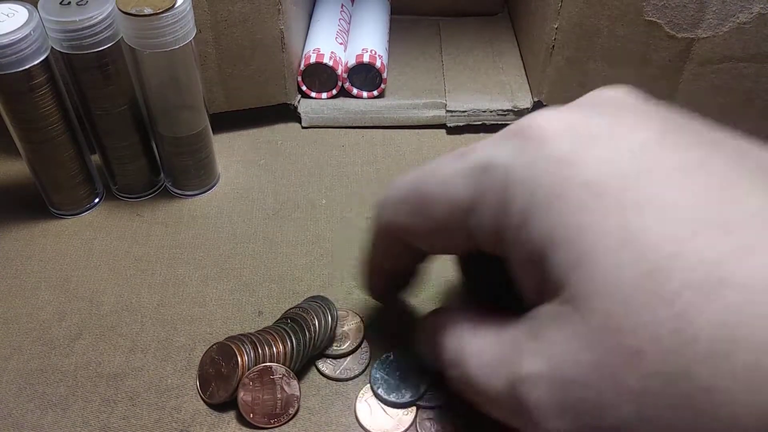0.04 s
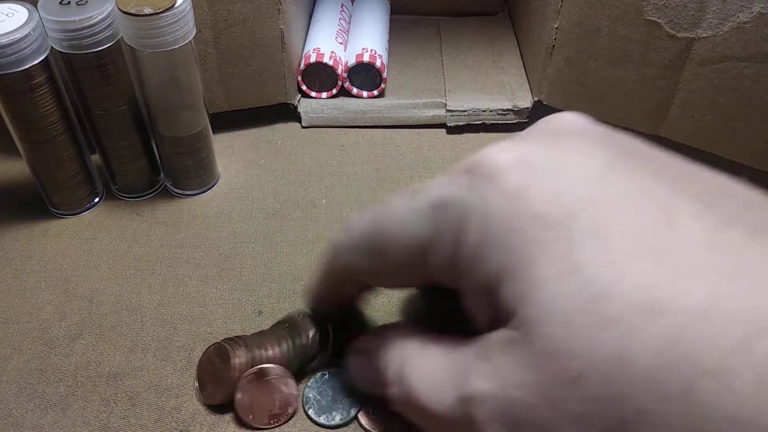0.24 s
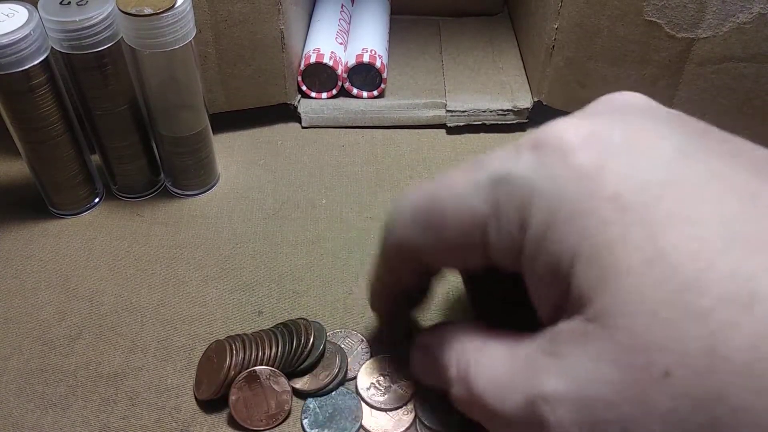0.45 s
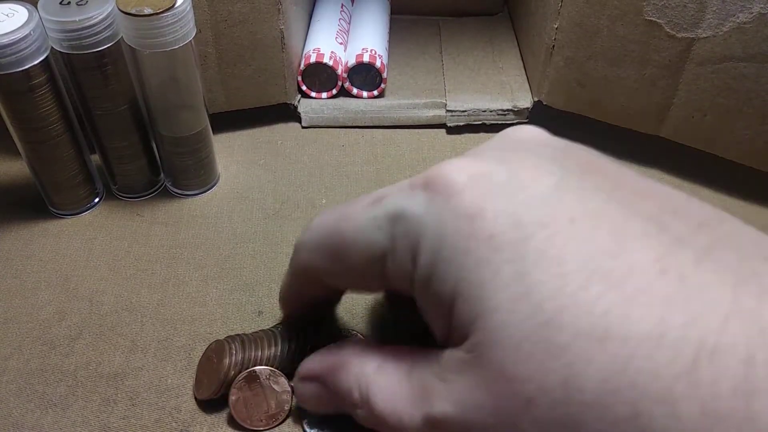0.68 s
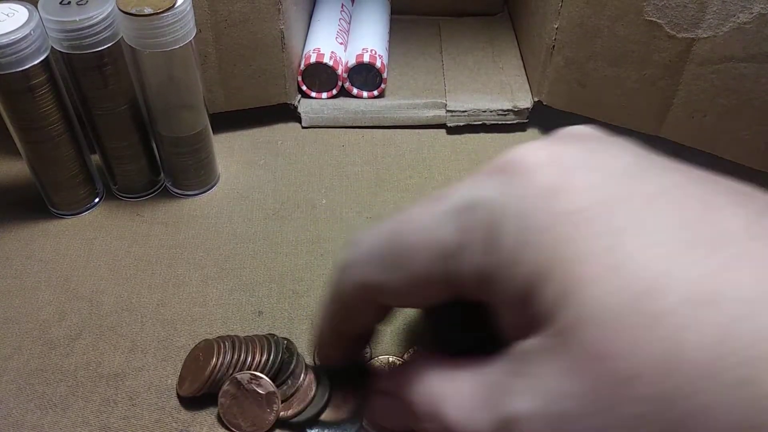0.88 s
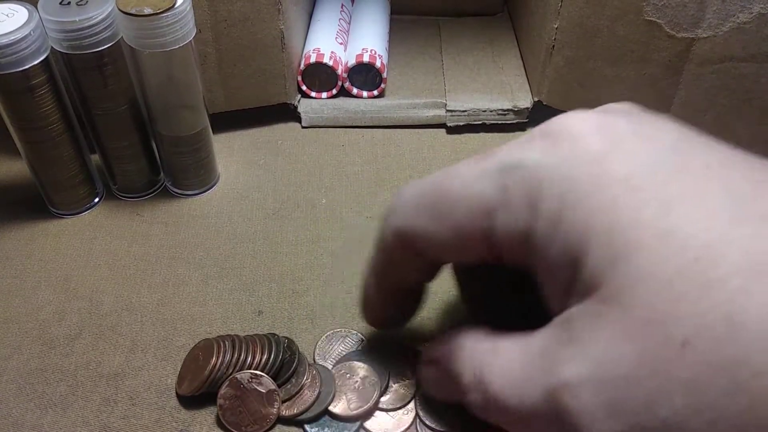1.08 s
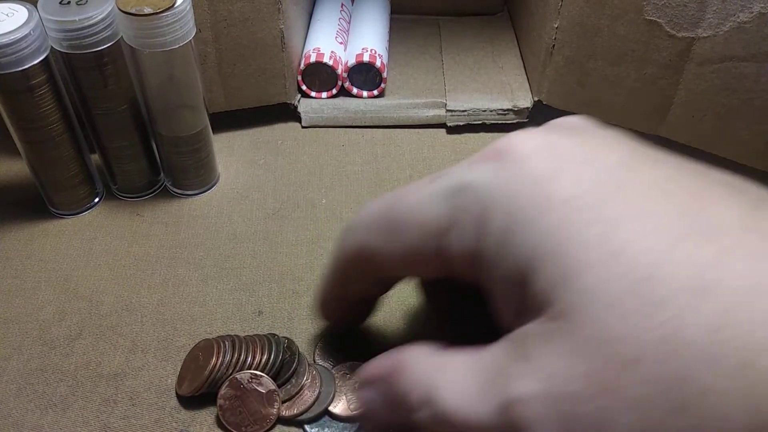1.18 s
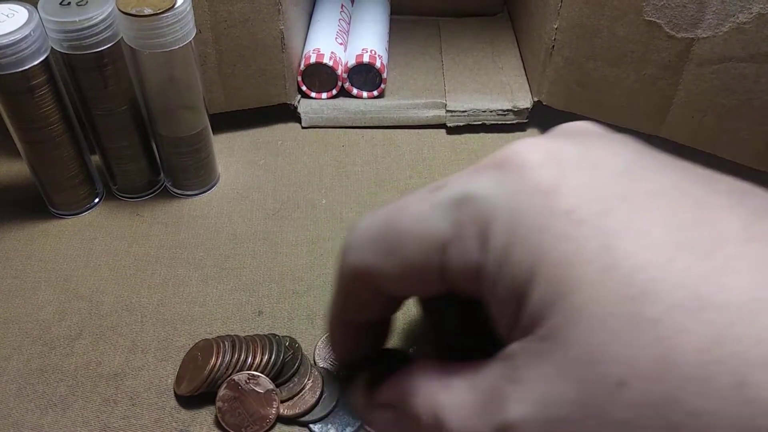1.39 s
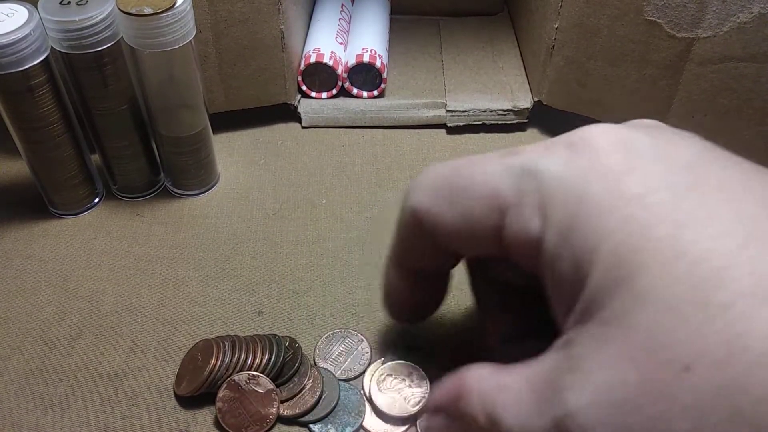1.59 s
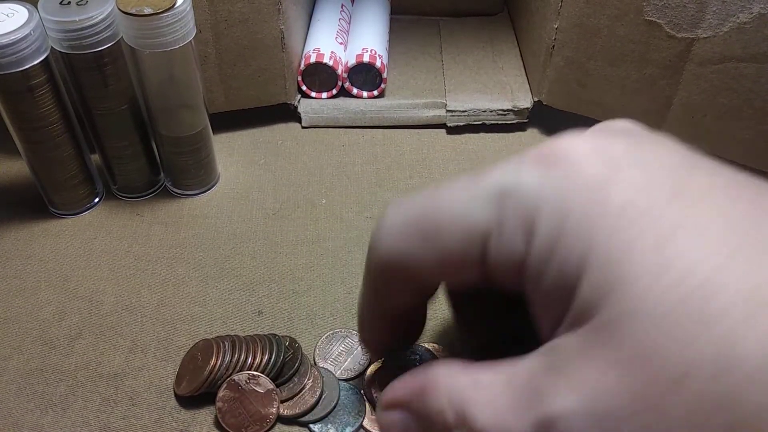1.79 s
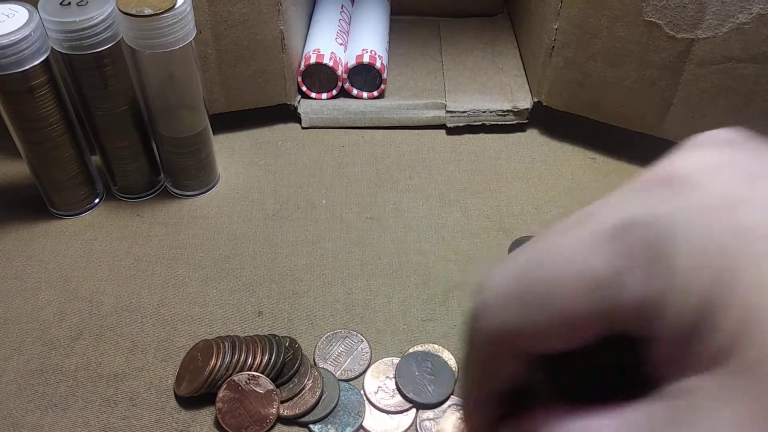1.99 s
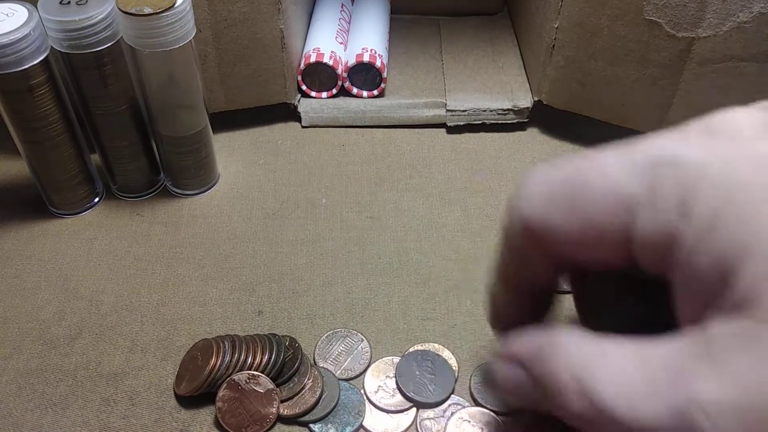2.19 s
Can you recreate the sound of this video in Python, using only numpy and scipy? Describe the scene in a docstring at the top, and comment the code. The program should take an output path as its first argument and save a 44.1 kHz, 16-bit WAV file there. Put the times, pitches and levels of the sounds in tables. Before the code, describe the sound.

Coins slide and click together on cardboard, heard up close in a quiet room. A first flurry of scrapes and short clicks peaks around 0.3 seconds with a soft thud. Lighter clinks and rubbing follow from 0.8 to 1 second. Sharper clicks come between 1.3 and 1.6 seconds, and a last cluster with rougher dragging near 2 seconds trails off. Now and then a coin rings briefly.

```python
"""Sorting coins in a cardboard box

Fingers slide coins over the floor of a box, heard up close in mono. The coins rub on the card,
grind across one another and knock together in short, dull clicks. Now and then a loose coin
rings or the card thuds. The box walls and a quiet room answer with short echoes."""
import sys
import numpy as np
from scipy import signal
from scipy.fft import rfft, irfft, next_fast_len
from scipy.io import wavfile
from scipy.ndimage import uniform_filter1d, map_coordinates

SR = 44100
rng = np.random.default_rng(int(sys.argv[2]) if len(sys.argv) > 2 else 0)


def wav_out(sig):
    """Save sig, one row per channel (or a flat mono array), as 16-bit PCM at SR to the path in sys.argv[1]."""
    wavfile.write(sys.argv[1], SR, np.round(np.clip(np.atleast_2d(sig).T, -1, 1) * 32767).astype(np.int16))


N = 99225

# Levels are relative. A "tone" sets the strength of each frequency; t60 is the time to fade by 60 dB.
# Tone of the room's hiss: f/Hz, level/dB
HISS_TONE = [(25, -9), (220, 4.5), (600, 4.5), (6400, -23), (7500, -28), (15700, -27.5)]
# How hard coins and fingers drag on the card: t/s, level/dB
DRAG_EFFORT = [(0, -55), (0.091, -65), (.122, -101.5), (0.148, -59.5), (.22, -56), (.32, -51.5), (.36, -60),
               (0.441, -55), (.49, -78), (0.529, -75), (.56, -63.5), (0.584, -63.5), (0.608, -83),
               (0.692, -73), (0.724, -57.5), (.79, -54.5), (.88, -56), (.95, -55), (1.02, -58),
               (1.043, -73.5), (1.11, -63.5), (1.174, -81.5), (1.235, -64), (1.28, -56), (1.36, -53),
               (1.55, -57.5), (1.687, -56), (1.715, -90.5), (1.75, -75), (1.824, -59.5), (1.859, -66.5),
               (1.887, -50.5), (1.96, -46.5), (2.051, -58), (2.25, -58.5)]
# Tone of the rasp on the card's fibres: f/Hz, level/dB
RASP_TONE = [(150, -14.5), (600, -0.5), (900, 3), (1350, 2), (1750, 0), (2250, 1.5), (4000, 0), (5500, -5),
             (6500, 1), (7300, -24.5), (10000, -14), (15700, -25)]
# Tone of the rumbling box floor: f/Hz, level/dB
RUMBLE_TONE = [(25, -47), (55, -6.5), (120, -5.5), (160, -3.5), (230, -0.5), (330, -5), (490, -9),
               (660, -14.5), (4000, -80.5)]
# A coin or finger presses down on the card: t/s, level/dB
PRESSES = [(0.295, -34), (.32, -42.5), (0.75, -49), (0.761, -42), (0.847, -42), (1.315, -46.5),
           (1.365, -42.5), (1.3817, -33.5), (1.502, -40), (1.872, -51), (1.942, -33), (1.991, -68)]
# The notes at which the box floor vibrates: f/Hz, level/dB, t60/s
CARD_NOTES = [(114, -16.5, 0.051), (165.4, -1.5, 0.07), (209, 1.5, 0.058), (265, -4, 0.044),
              (403, -2, 0.049), (444.4, -9, 0.026)]
# The notes of the coin heap in its box: f/Hz
HEAP_NOTES = [2300, 2745, 3035, 3355, 4035, 4325, 4817, 5170, 6274, 6600, 7226, 7494, 7787, 8888]
# One coin rings, lower and shorter when it lies against others: t/s, level/dB, f/Hz, t60/s
COIN_RINGS = [(.263, -45, 13200, 0.013), (.804, -47, 12900, 0.029), (.8185, -34, 12850, 0.054),
              (.8447, -30.5, 12750, 0.051), (.9203, -40, 13000, 0.019), (.9735, -29.5, 7400, 0.014),
              (1.3695, -33, 13030, .04), (1.5015, -23.5, 4120, 0.02), (1.9785, -40, 13150, .04),
              (1.9905, -34.5, 12900, 0.033)]
# A coin's closely spaced notes: ratio to its pitch, level/dB
COIN_NOTES = [(.99, -1.5), (1.008, -1), (1.035, -7.5)]
# Coin grinds over coin, rising to a peak at t and falling again, by 20 dB each way:
# t/s, level/dB, rise/s, fall/s, brightness/(dB per octave), singing f/Hz
STROKES = [(0.186, -48.5, 0.046, 0.18, -1, 4120), (0.289, -42.5, 0.066, 0.089, -5, 7200),
           (0.308, -25, .026, 0.014, 10.5, 7600), (0.392, -40.5, 0.057, 0.04, 0, 5200),
           (0.794, -50.5, 0.077, 0.19, 6.5, 2830), (.947, -40, 0.068, 0.038, 3.5, 6670),
           (1.375, -42.5, 0.071, 0.078, 0.5, 6400), (1.461, -51.5, 0.084, 0.17, -2, 3900),
           (1.61, -51, 0.082, 0.058, 3, 4130), (1.9, -45, 0.024, 0.032, -1, 3990),
           (1.95, -28.5, 0.019, 0.023, 0, 7800), (1.965, -37.5, .02, 0.06, 5.5, 3420),
           (2.02, -53, 0.1, 0.23, -2.5, 2880)]
# Tone of the grinding: f/Hz, level/dB
SCRAPE_TONE = [(80, -26), (230, -1.5), (500, -1.5), (750, -15), (1700, -14.5), (2200, 0), (5000, -1),
               (7700, -7.5), (9400, -8), (11300, -24.5), (13200, -16.5), (15700, -17)]
# Coin knocks on coin: t/s, level/dB, chatter length/s, brightness/(dB per octave), top treble/dB
CONTACTS = [(0.134, -48.5, .003, -6, 6), (0.219, -27.5, .0014, -4, 5.5), (.263, -48, .004, -2, 2),
            (0.291, -37, .0015, 3.5, -2.5), (0.2946, -24, .002, 6.5, -11.5), (0.2987, -29.5, .001, -13, -5),
            (0.312, -24.5, .001, 15, -7), (0.317, -30, .0015, 6.5, -7.5), (0.3197, -23.5, .0015, -1, -3),
            (0.335, -26, .0008, 8, -9), (0.339, -31.5, .003, -3.5, -1), (0.353, -35.5, .0012, 4, 1),
            (0.3885, -35.5, .003, -2, 4), (0.7618, -39, .001, 5, -2), (0.7893, -38, .006, -0.5, 1),
            (0.805, -35.5, .002, -1, 3), (0.8178, -26.5, .0015, 4.5, 0), (0.8234, -35, .002, -5, 1),
            (0.8451, -28, .005, -0.5, 11), (0.858, -31, .0015, 6, -1), (.913, -39, .002, 1, -18),
            (0.962, -41, .002, -1, -15), (0.999, -44, 0.004, -4, -3), (1.263, -41.5, .003, -2, -6.5),
            (1.2669, -33, .0028, 1, -15), (1.304, -45, .005, -2, -2), (1.33, -41, .001, -3, -4),
            (1.352, -38, .003, -5, -14), (1.3645, -32.5, .003, 0.5, 2), (1.3688, -19.5, .0012, 2.5, 1),
            (1.3797, -23.5, .0005, 5, 18), (1.38, -22, .003, -1, 4), (1.4256, -40.5, .002, 8.5, 6),
            (1.478, -42, .002, -9, -3), (1.5018, -21.5, .0038, -3.5, 13), (1.5957, -39, .003, -4.5, 2),
            (1.6017, -36, .003, -3.5, 3), (1.6125, -29.5, .004, -4, 10.5), (1.6503, -35, .0012, -5.5, -5),
            (1.882, -45, 0.0027, -0.5, 3), (1.9075, -35, .001, 16, 0), (1.915, -35, .003, -1.5, 9),
            (1.9348, -25.5, .0015, 6, -18), (1.939, -22.5, .0035, 5, -0.5), (1.9484, -46, .003, 18, 2),
            (1.970, -25.5, .002, -5.5, 2), (1.991, -27.5, .005, -8.5, 16), (2.006, -37, .003, -4.5, 5),
            (2.0393, -40, .003, -4.5, 10), (2.081, -40.5, .002, -7.5, 11), (2.1226, -45, .002, -4, 9)]
# Tone of a knock between coins: f/Hz, level/dB
CLICK_TONE = [(80, -22), (250, 0), (500, -6.5), (750, -14.5), (1700, -14), (2100, 1), (4200, 3), (7000, 3),
              (9500, 1), (11500, -10), (13200, -6), (15700, -12)]


def amp(db):
    """Turn decibels into a factor to multiply by."""
    return 10 ** (np.asarray(db) / 20)


def unit(x):
    """Scale a signal to an average power of 1."""
    return x / np.sqrt(np.mean(x ** 2) + 1e-20)


def add(track, start_s, sound):
    """Mix a sound into the track at the given time."""
    part = track[max(0, round(start_s * SR)):][:len(sound)]
    part += sound[:len(part)]


def with_tone(x, tone, tilt_db=0, top_db=0):
    """Filter x to a tone; tilt_db is added per octave from 2 to 9 kHz, top_db above about 10 kHz."""
    size = 2048
    f = np.fft.rfftfreq(size, 1 / SR) + 1
    hz, db = np.transpose(tone)
    tilt = tilt_db * np.log2(np.clip(f, 2000, 9000) / 2000)
    top = top_db * np.clip((f - 8500) / 3000, 0, 1)
    gain = amp(np.interp(np.log(f), np.log(hz), db) + tilt + top)
    # Fold the filter forward in time, so nothing sounds before the hit that causes it.
    cepstrum = irfft(np.log(gain))
    cepstrum[1:size // 2] *= 2
    cepstrum[size // 2 + 1:] = 0
    kernel = irfft(np.exp(rfft(cepstrum)))
    return signal.fftconvolve(x, kernel / np.linalg.norm(kernel))[:len(x)]


def slips(per_s, spread, size=N):
    """Friction: tiny random hits of uneven size, kept at a steady overall strength."""
    hits = (rng.random(size) < per_s / SR) * np.sign(rng.standard_normal(size))
    hits *= np.exp(spread * rng.standard_normal(size))
    power = np.abs(uniform_filter1d(hits ** 2, size=400))
    return hits / np.sqrt(power + 1e-6)


def wobble(per_s):
    """A smooth curve through per_s random values each second."""
    return map_coordinates(rng.standard_normal(N // 10), [np.arange(N) * per_s / SR])


def struck(notes, attack_s):
    """One blow starts several fading notes, each a little stronger or weaker by chance."""
    t = np.arange(SR // 4) / SR
    ringing = sum(amp(db + rng.normal(0, 2) - 60 * t / t60) * np.sin(2 * np.pi * hz * t)
                  for hz, db, t60 in notes)
    return ringing * (1 - np.exp(-t / attack_s))


def room_hiss():
    """The faint, steady hiss of a quiet room."""
    return amp(-81.5) * with_tone(rng.standard_normal(N), HISS_TONE)


def wall_echo(x, t60, delay_s):
    """Walls send the sound back after a short delay, as a fading blur."""
    t = np.arange(SR // 3) / SR
    tail = rng.standard_normal(len(t)) * amp(-60 * t / t60) * (t > delay_s)
    return signal.fftconvolve(x, tail / np.linalg.norm(tail))[:N]


def with_heap_ring(x, t60=0.044):
    """The heap of coins rings briefly along with every contact."""
    t = np.arange(SR // 8) / SR
    decay = np.log(1000) / t60
    notes = sum(np.cos(2 * np.pi * hz * t) for hz in HEAP_NOTES)
    ring = 2 * decay / SR * np.exp(-decay * t) * notes
    return x + amp(-5.5) * signal.fftconvolve(x, ring)[:N]


def card_dragging(flutter_db=2.5, knocks_per_s=160):
    """Dragging rasps on the fibres, makes the box floor rumble and jostles the coins into tiny ticks."""
    effort_db = np.interp(np.arange(N) / SR, *np.transpose(DRAG_EFFORT))
    effort = amp(effort_db + flutter_db * wobble(per_s=90))
    rasp = with_tone(effort * slips(per_s=7000, spread=0.29), RASP_TONE)
    rumble = with_tone(effort * slips(per_s=7000, spread=0.29), RUMBLE_TONE)
    knocks = (rng.random(N) < knocks_per_s / SR) * np.exp(0.6 * rng.standard_normal(N))
    ticks = with_heap_ring(with_tone(knocks * effort ** 2 / effort.max(), CLICK_TONE))
    return amp(-3.5) * (rasp + rumble) + amp(16) * ticks


def card_thuds(pitch_spread=0.025):
    """The box floor booms; small random shifts of pitch stand for the hand's changing pressure."""
    out = np.zeros(N)
    for start_s, db in PRESSES:
        notes = [(hz * (1 + pitch_spread * rng.normal()), level, t60) for hz, level, t60 in CARD_NOTES]
        add(out, start_s, amp(db) * struck(notes, attack_s=0.0037))
    return out


def coin_rings():
    """A knocked coin rings briefly; its close notes beat against each other and shimmer."""
    out = np.zeros(N)
    for start_s, db, hz, t60 in COIN_RINGS:
        notes = [(hz * ratio, level, t60) for ratio, level in COIN_NOTES]
        add(out, start_s, amp(db) * struck(notes, attack_s=0.0009))
    return out


def coin_scrapes(lead_s=0.15, medium_db=-40.5, medium_catches_per_s=4500, grab_db=2.6):
    """Rims catch on the coins' raised faces, more often in fast, loud strokes; the coin sings faintly."""
    out, t = np.zeros(N), np.arange(SR // 2) / SR
    for peak_s, db, rise_s, fall_s, tilt_db, hz in STROKES:
        from_peak = np.maximum((lead_s - t) / rise_s, (t - lead_s) / fall_s)
        swell = amp(db - 20 * from_peak ** 1.35)
        speed = amp((db - medium_db) / 2)
        catches = slips(medium_catches_per_s * speed, spread=0.5, size=len(t))
        grip = amp(grab_db * wobble(per_s=220)[:len(t)])
        grit = unit(catches * grip)
        song = unit(signal.lfilter(*signal.iirpeak(hz, Q=18, fs=SR), grit))
        grind = with_tone(swell * grit, SCRAPE_TONE, tilt_db)
        add(out, peak_s - lead_s, grind + amp(-8.5) * swell * song)
    return out


def coin_clicks(chatter_spread=0.32, buzz_t60=0.027):
    """Coin hits coin: a sharp burst of tiny impacts (the chatter), then a faint dying buzz."""
    out, t = np.zeros(N), np.arange(2048) / SR
    for start_s, db, length_s, tilt_db, top_db in CONTACTS:
        fade = np.exp(-(t / length_s) ** 2)
        chatter = fade * rng.standard_normal(len(t))
        chatter *= np.exp(chatter_spread * rng.standard_normal(len(t)))
        chatter *= np.linalg.norm(fade) / np.linalg.norm(chatter)  # chance does not change its energy
        buzz = amp(-10 - 60 * t / buzz_t60) * rng.standard_normal(len(t))
        add(out, start_s, amp(db) * with_tone(chatter + buzz, CLICK_TONE, tilt_db, top_db))
    return out


def scene():
    """Coins and card sound inside the box, and the room adds its echo and hiss."""
    coins = amp(-2.5) * with_heap_ring(coin_clicks() + coin_scrapes()) + coin_rings()
    box_echo = amp(-10) * wall_echo(coins, t60=0.0067, delay_s=0.0013)
    box = coins + box_echo + card_dragging() + card_thuds()
    room_echo = amp(-17) * wall_echo(box, t60=0.057, delay_s=0.0063)
    return (box + room_echo + room_hiss())[None]


def record(dry):
    """Cut away the deep bass and the very highest treble."""
    low_hz, top_hz = 56, 16000
    thinned = signal.sosfilt(signal.butter(4, low_hz, "high", fs=SR, output="sos"), dry)
    size = next_fast_len(N + SR // 2)
    treble_cut = 1 / (1 + (np.fft.rfftfreq(size, 1 / SR) / top_hz) ** 160)
    return irfft(rfft(thinned, size) * treble_cut, size)[..., :N]


dry = scene()
out = record(dry)
wav_out(out)
```